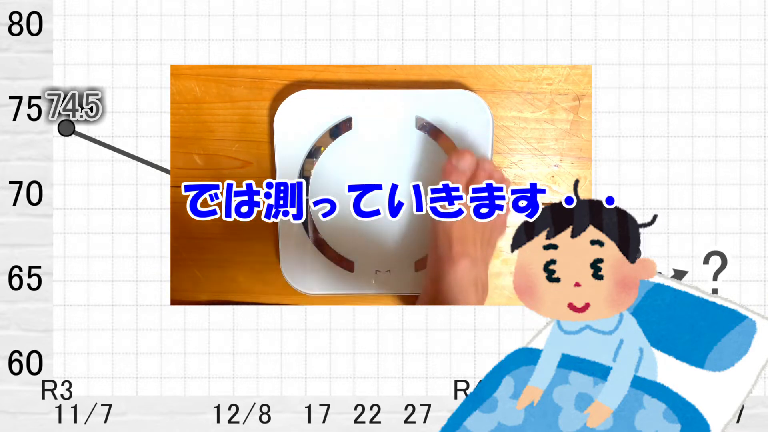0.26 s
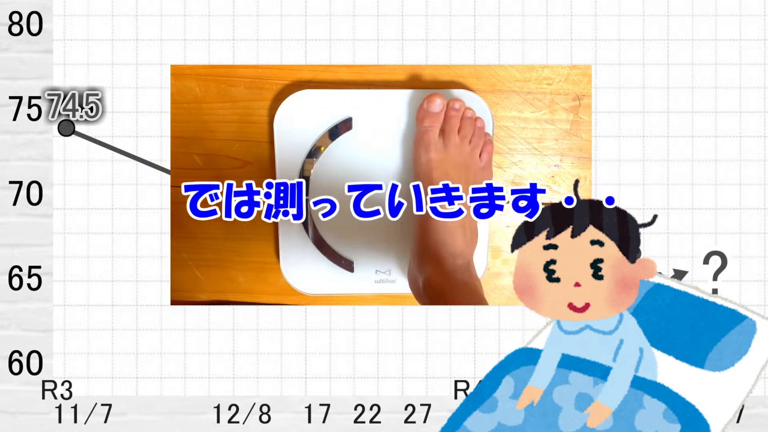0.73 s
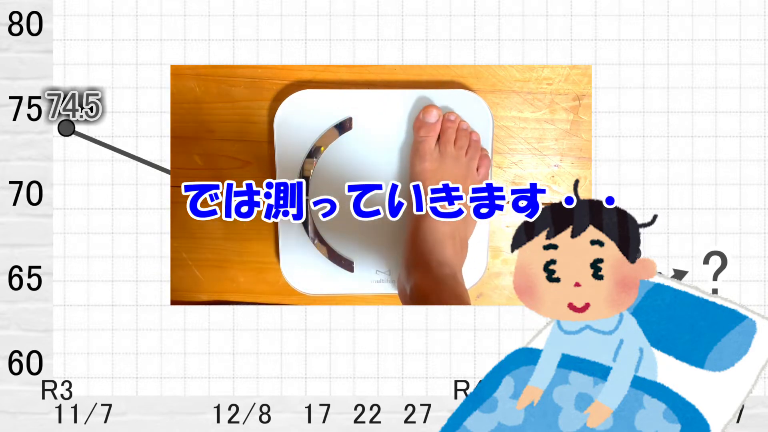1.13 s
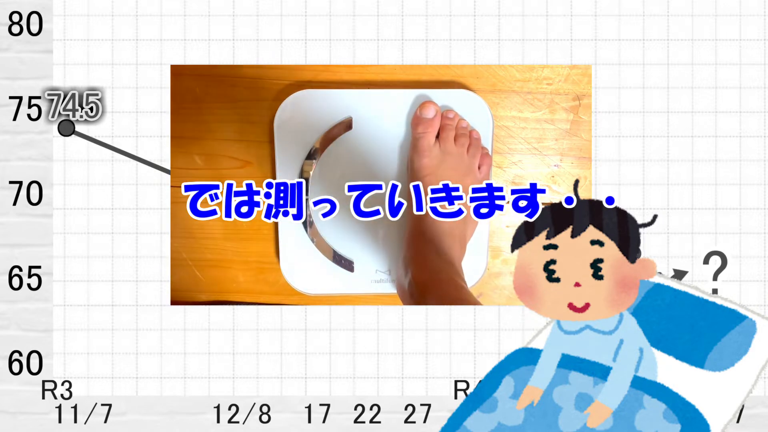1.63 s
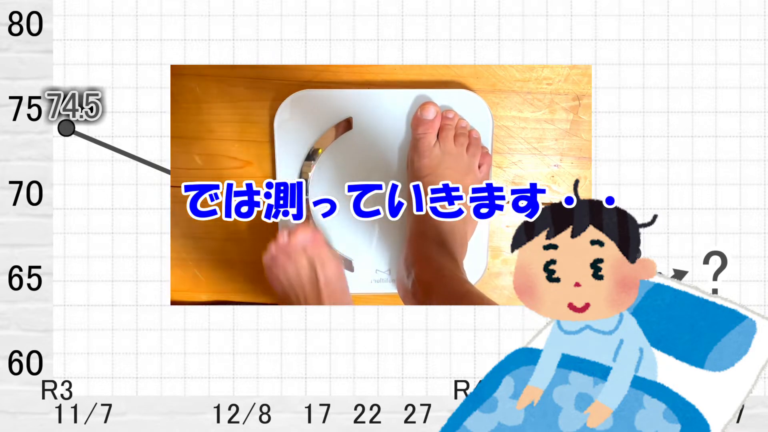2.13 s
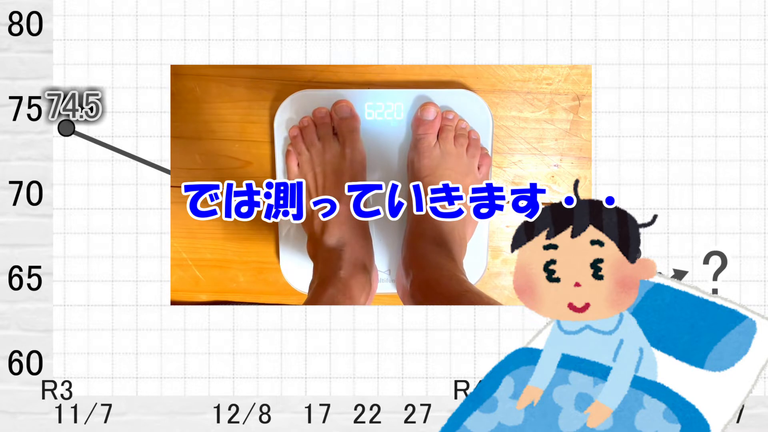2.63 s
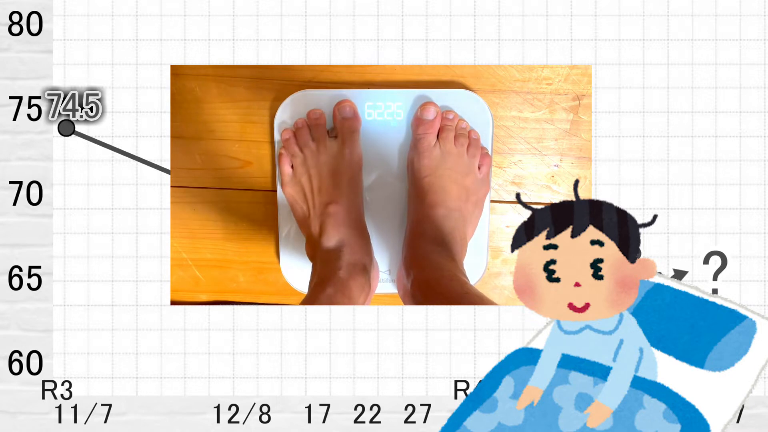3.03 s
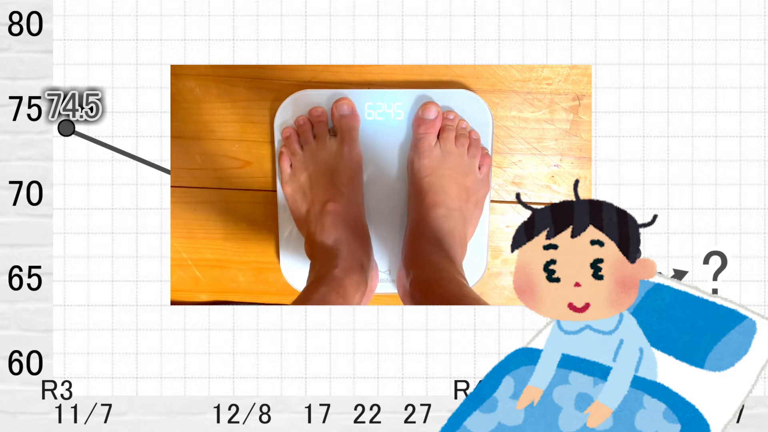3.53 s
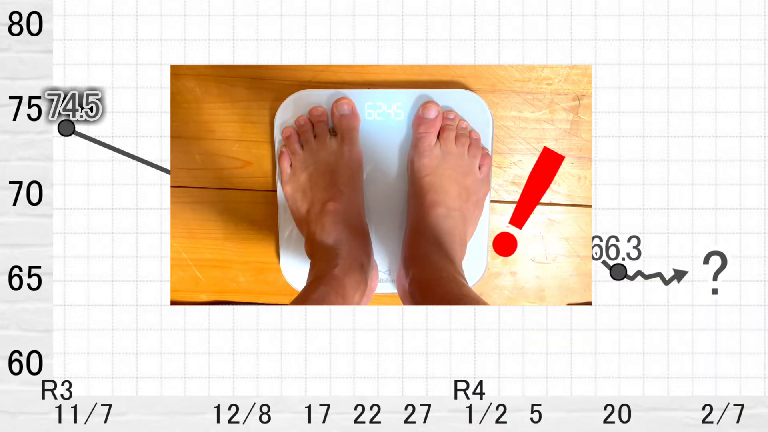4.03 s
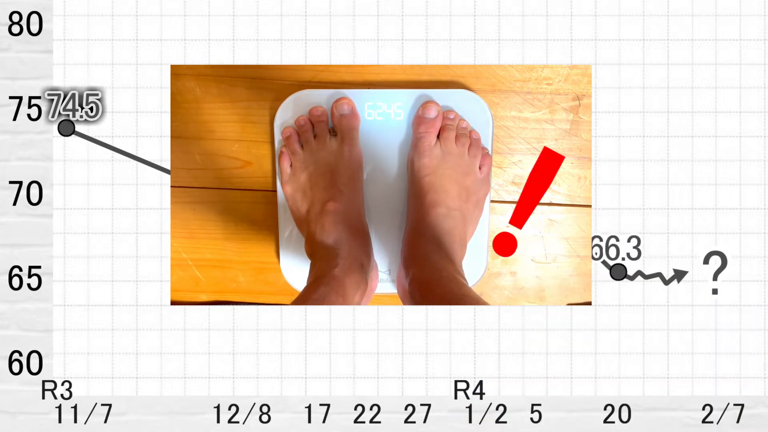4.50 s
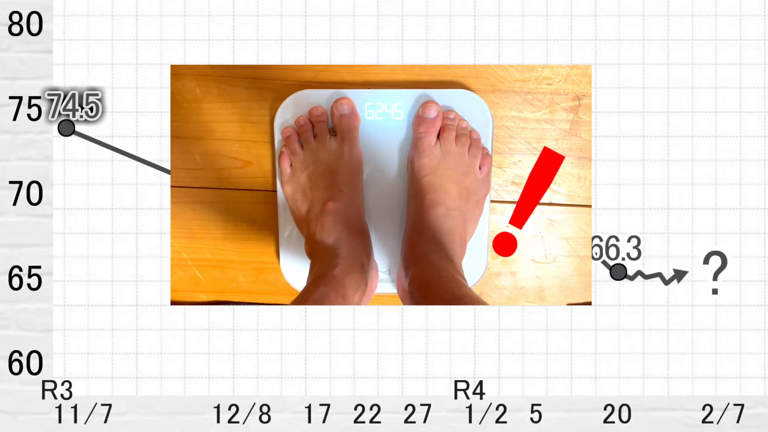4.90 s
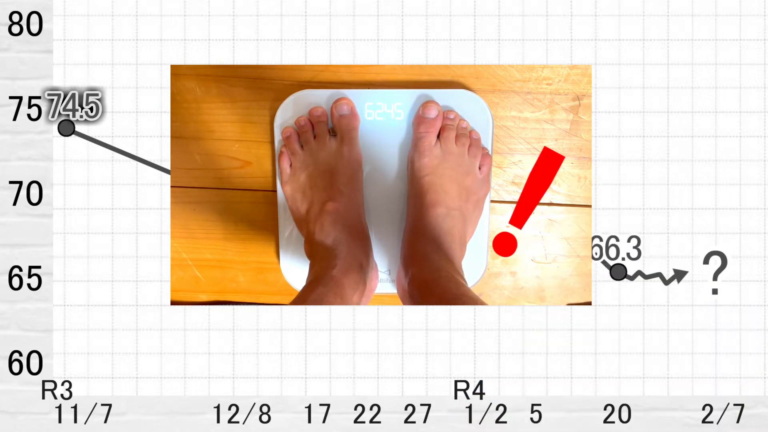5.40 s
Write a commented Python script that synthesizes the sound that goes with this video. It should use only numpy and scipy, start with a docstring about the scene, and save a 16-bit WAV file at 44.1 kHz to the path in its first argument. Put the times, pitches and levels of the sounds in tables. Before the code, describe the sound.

A phone held above a scale picks up deep wavering hum and soft room hiss. A foot slides on quietly, one crisp click stands out, and lighter clicks trail after it. The other foot lands with muffled thuds into the boards, followed by a short skin rub and a last few ticks. The hum continues alone, skipping slightly with a dry tick. Short, close indoor echoes.

```python
"""Small bathroom with a wooden floor: bare feet step onto a glass scale, heard from above by a phone.
Clicks are noise bursts ringing the scale's modes; sliding skin is grainy hiss with a resonant squeak.
Thuds into the boards are decaying resonant noise. A machine hums in wavering sines over steady
noise-driven resonances, with broad noise and hiss behind. Near the end the hum jumps in phase, with a tick."""
import sys
import numpy as np
from scipy import signal
from scipy.fft import rfft, irfft, next_fast_len
from scipy.io import wavfile
from scipy.ndimage import uniform_filter1d

SR = 44100
rng = np.random.default_rng(int(sys.argv[2]) if len(sys.argv) > 2 else 0)


def pcm_store(signal):
    """Save signal as 16-bit PCM."""
    levels = np.round(np.clip(np.atleast_2d(signal), -1, 1) * 32767)
    wavfile.write(sys.argv[1], SR, levels.astype(np.int16).T)


N = 249253

JUMP_S = 4.5018  # phase jump of the hum, and its tick


def amp(db):
    """Decibels to gain."""
    return 10 ** (np.asarray(db) / 20)


def evened(x):
    """Scales to rms 1."""
    return x / np.sqrt(np.mean(x ** 2) + 1e-20)


def read(points, hz):
    """Interpolates (hz, value) points on a log-frequency axis."""
    point_hz, value = np.transpose(points)
    return np.interp(np.log(hz + 1), np.log(point_hz + 1), value)


def add(mix, start_s, sound):
    """Mixes a sound in at a time, cut at the end of the mix."""
    part = mix[round(start_s * SR):][:len(sound)]
    part += sound[:len(part)]


def resonate(x, hz, width_hz):
    """Steep resonance: shifts hz down to zero, applies a double pole, shifts back."""
    turn = np.exp(2j * np.pi * np.cumsum(hz * np.ones(len(x))) / SR)
    r = np.exp(-np.pi * abs(width_hz) / SR)
    smooth = signal.lfilter([(1 - r) ** 2], [1, -2 * r, r * r], x / turn)
    return 2 * (turn * smooth).real


def shape(x, gain_db):
    """Filters by a gain that is a function of frequency."""
    hz = np.fft.rfftfreq(len(x), 1 / SR)
    return irfft(rfft(x) * amp(gain_db(hz)), len(x))


def drift(t, top_hz):
    """Slow random waver of rms 1: sines from 0.2 Hz to top_hz, weaker as they get faster."""
    rates_hz = np.geomspace(.2, top_hz, num=20)
    return evened(sum(np.sin(2 * np.pi * (f * t + rng.random())) / np.sqrt(f) for f in rates_hz))


def click(level_db, hz, narrow_db, low_db, high_db, treble_db):
    """A short rattle drives the scale's modes; where it lands decides which ones answer."""
    # modes of the scale: mode_hz, least width_hz, level_db
    plate = [(464, 130, -4.5), (617, 124, 4.5), (858, 130, -2.5), (1012, 67, 7), (1600, 790, 0.5),
             (2390, 1260, 6.5), (2540, 650, 6), (3180, 1250, 0.5), (4000, 1060, 4), (4030, 1400, 5.5),
             (5530, 630, 1.5), (6200, 580, 0), (7600, 2200, 3), (8040, 770, 0), (9500, 3100, 5),
             (13200, 2400, -7.5), (14800, 2500, -7)]
    rattle_t60_s, rise_s = 0.02, .0007
    max_sharpness = 7  # pitch over width, damped by the foot
    t = np.arange(2500) / SR
    rise = 1 - np.exp(-t / rise_s)
    rattle = rng.standard_normal(len(t)) * rise * amp(-60 * t / rattle_t60_s)
    loose_part = (hz, hz * 0.26, 1.5)
    out = 0
    for k, (mode_hz, width_hz, mode_db) in enumerate([*plate, loose_part]):
        if mode_hz < 740:
            share_db = low_db
        elif mode_hz < 1200:
            share_db = high_db
        elif mode_hz > 8000:
            share_db = treble_db
        else:
            share_db = -abs(narrow_db) * min(np.log2(mode_hz / hz) ** 2, 3)
        ring = resonate(rattle, mode_hz, max(width_hz, mode_hz / max_sharpness))
        sign = (-1) ** k
        out = out + sign * amp(mode_db + share_db) * ring / abs(ring).max()
    return amp(level_db) * out


def slide(rise_s, hold_s, fall_s, level_db, treble_db, squeak_hz, squeak_db):
    """Skin catching on glass: hiss broken into small grains, with a squeak; both follow the speed."""
    # colour of the hiss: hz, relative level_db_per_hz
    skin = [(600, -28), (1100, -5.5), (1600, -5.5), (2400, -1.5), (4000, -7), (6000, -10), (7800, -16.5),
            (10000, -13), (13000, -17.5), (15500, -14)]
    quiet_db = -20  # at start and end, relative to full speed
    squeak_sag = .05  # share by which the squeak sits lower at no speed
    split_hz = 8300
    t = np.arange(0, rise_s + hold_s + fall_s, 1 / SR)
    speed = np.clip(np.minimum(t / rise_s, (t[-1] - t) / fall_s), 0, 1)
    slow = 1 - speed
    grain_noise = uniform_filter1d(rng.standard_normal(len(t)), size=160)
    grains = amp(2.4 * evened(grain_noise))
    hiss = shape(grains * rng.standard_normal(len(t)), lambda f: read(skin, f))
    low = evened(shape(hiss, lambda f: -80 * (f > split_hz)))
    high = evened(shape(hiss, lambda f: -80 * (f < split_hz)))
    squeak = evened(resonate(hiss, squeak_hz * (1 - squeak_sag * slow), 348.4))
    sound = low + amp(treble_db) * high + amp(squeak_db) * squeak
    return amp(level_db + quiet_db * slow) * sound


def thud(level_db, hz):
    """Weight sinking into the boards: a soft push, dull and slow to rise."""
    t60_s, rise_s = 0.13, 0.0021
    t = np.arange(9000) / SR
    push = evened(resonate(rng.standard_normal(len(t)), hz, 240))
    return amp(level_db - 60 * t / t60_s) * (1 - np.exp(-t / rise_s)) * push


def hum():
    """Machine: sines wavering in level and phase, over steady noise-driven resonances up to about 1 kHz."""
    # mean pitches of the steady tones: hz
    tone_hz = [58.3, 65.33, 202.62, 415.3]
    # phase each tone skips at the jump: turns
    skip_turns = [0, -.47, .4, 0]
    # steady tones: level_db (main tone: offset from main_level), waver_db
    tone_levels = [(-53.5, 4.3), (0, -0.23), (-59.5, 2.1), (-70.5, 3.5)]
    # slow level of the main tone: time_s, level_db
    main_level = [(0.0, -37), (0.22, -42.5), (0.6, -44), (1.15, -40), (1.35, -45.5), (1.92, -41),
                  (2.44, -43.5), (2.6, -41), (3.07, -43.5), (3.43, -40), (4.09, -42.5), (4.88, -43.5),
                  (5.3, -39.5), (5.48, -40), (5.65, -42.5)]
    # swells of the main tone's octave: time_s, level_db
    octave_level = [(0.0, -59.5), (0.38, -57), (0.42, -68), (1.64, -60.5), (1.78, -56), (2.0, -65.5),
                    (2.36, -57), (2.69, -56), (3.02, -64.5), (3.59, -62.5), (3.7, -74), (4.06, -58.5),
                    (4.48, -53), (5.22, -64), (5.65, -60.5)]
    # steady noise-driven resonances: hz, width_hz, level_db (before the bass cut)
    boom = [(44.2, 12, -69), (63, 12, -52), (91, 10, -55.5), (584, 90, -85.5), (972, 100, -89)]
    main_hz = tone_hz[1]
    t = np.arange(N) / SR
    after_jump = np.clip((t - JUMP_S) / .003 + .5, 0, 1)  # 3 ms ramp

    octave_db = np.interp(t, *np.transpose(octave_level))
    octave_phase = 2 * np.pi * (2 * main_hz * t + rng.random()) + 0.41 * drift(t, 3.2)
    out = np.sqrt(2) * amp(octave_db) * np.sin(octave_phase)
    for hz, turns, (level_db, waver_db) in zip(tone_hz, skip_turns, tone_levels):
        if hz == main_hz:
            level_db = level_db + np.interp(t, *np.transpose(main_level))
        phase = 2 * np.pi * (hz * t + rng.random() + turns * after_jump) + 0.13 * drift(t, 1.5)
        out += np.sqrt(2) * amp(level_db + waver_db * drift(t, 3)) * np.sin(phase)
    for hz, width_hz, level_db in boom:
        out += amp(level_db) * evened(resonate(rng.standard_normal(N), hz, width_hz))
    return out


def tick():
    """The wave steps down at the hum's jump and settles exponentially: a dry tick."""
    step_db, settle_s = -43, 0.0054
    out = np.zeros(N)
    add(out, JUMP_S, -amp(step_db) * np.exp(-np.arange(800) / SR / settle_s))
    return out


def air():
    """Broad room noise and microphone hiss: shaped spectral noise, faintly patchy in time and pitch."""
    # colour: hz, relative level_db_per_hz
    colour = [(30, -11.5), (50, -5.5), (100, -6.5), (170, -16.5), (300, -19), (450, -16), (510, -30.5),
              (750, -32), (1150, -40), (2000, -45), (4500, -51.5), (8000, -56.5), (11000, -60.5),
              (13000, -65.5)]
    # left-right correlation of the noise: hz, correlation
    correlation = [(120, 1), (290, 0.66), (640, -0.33), (1400, -0.13), (3000, 0.1), (4600, .25), (5500, 1),
                   (7500, .75), (9500, 0.81), (11000, 1), (13000, 0.52), (15500, 0.78)]
    # channel balance: hz, left_minus_right_db
    tilt = [(60, 1), (240, 1.5), (950, 0), (3770, 0.5), (15000, -0.5)]
    level_db, patch_db = -51.5, 1.64
    frames, hz = N // 512 + 5, np.fft.rfftfreq(2048, 1 / SR)
    a, b, c, d, patches = rng.standard_normal((frames, 1025, 5)).T
    patches = uniform_filter1d(patches, size=6, axis=1)
    patches = evened(uniform_filter1d(patches, size=20, axis=0))
    same = np.clip(read(correlation, hz), -1, 1)[:, None]
    left = a + 1j * b
    right = same * left + np.sqrt(1 - same ** 2) * (c + 1j * d)
    balance_db = np.multiply.outer([.5, -.5], read(tilt, hz))[..., None]
    z = np.array([left, right])
    z *= amp(read(colour, hz)[:, None] + patch_db * patches + balance_db)
    noise = signal.istft(z, nperseg=2048, noverlap=1536)[1][:, :N]
    return amp(level_db) * evened(noise)


def room(x):
    """Echoes: sparse taps of random sign, each band dying at its own speed, largely shared left and right."""
    # decay: hz, t60_s
    decay = [(300, 0.085), (1500, 0.13), (5000, 0.1), (10000, 0.11), (15000, 0.077)]
    taps = np.zeros((3, SR // 2))
    at = np.arange(200, SR // 2 - 8, 8) + rng.integers(0, 8, (3, (SR // 2 - 201) // 8))
    np.put_along_axis(taps, at, rng.choice([-1., 1.], at.shape), 1)
    shared, own = taps[0], taps[1:]
    hz, t, z = signal.stft(shared + 0.43 * own, SR, nperseg=128)
    fade = amp(-60 * t / read(decay, hz)[:, None])
    tail = signal.istft(z * fade, SR, nperseg=128)[1]
    return signal.fftconvolve(x[None], tail / np.linalg.norm(tail[0]), axes=1)[:, :N]


def scene():
    """Feet and scale, direct and echoed by the room, over hum and air."""
    # clicks: start_s, level_db, stressed pitch_hz, narrowing_db_per_octave_squared (sign ignored),
    # low_knock_db, high_knock_db, treble_db
    clicks = [(0.2225, -76, 1400, 6, 10, -4, -25), (0.9038, -57, 1600, 9.5, -12, -14, -27),
              (0.9414, -73, 2670, 11, -6, -12, 0), (1.2346, -66.5, 3200, -2, -5, -9, -4),
              (1.2585, -39, 5210, 3.5, -2, -13.5, -2.5), (1.2698, -58.5, 3750, 3, 1, -4, 2),
              (1.3244, -68.5, 1900, 0.5, -9, -9, -6), (1.3808, -59.5, 3100, 10.5, 5.5, -12, -30),
              (1.4521, -65, 1850, 9, -14, -12, -30), (1.509, -51, 3480, 7, -19, -28, 0.5),
              (1.5214, -53.5, 3000, 5.5, -10, -20, -25), (1.5304, -62, 5100, -2, -10, -9, -3),
              (1.6556, -62, 2260, 5, -29, -9, -30), (1.8332, -58.5, 2120, 2.5, -8, -12, -3),
              (1.8554, -74, 2000, 6, -20, -14, -25), (1.8726, -68, 1990, 6, -14, -12, -21),
              (1.935, -65.5, 1920, 4, -25, -21, -10), (2.4633, -71, 3340, 7, -16, -18, -17),
              (2.4962, -54, 3000, 4, -34, -21, -1), (2.5044, -69, 2250, 10, -20, 1.5, -22),
              (2.5214, -67, 3750, 7, -17, -14, -12), (2.539, -77, 4500, 4, -20, -15, -8),
              (2.5965, -69, 3300, 10, -2, -4.5, -30), (2.6074, -75, 4000, 8, 0, -6, -21),
              (2.6224, -74, 2980, 6, -5, -16, -24), (2.9377, -68, 2500, -2, -12, -15, -14),
              (3.1425, -71, 1300, 5, 1, 5, -25), (3.1577, -65.5, 2600, 6, -16, -8, -16),
              (3.2515, -69.5, 2600, 4.5, -14, -8, -20)]
    # skin slides: start_s, rise_s, hold_s, fall_s, level_db, treble_db, squeak_hz, squeak_db
    slides = [(0.19, 0.033, 0.16, 0.057, -82.5, -16, 1360, 1),
              (0.86, 0.024, 0.076, 0.08, -75.5, -14, 1900, -13),
              (1.085, 0.048, 0.052, .035, -65.5, -13, 2350, -21),
              (1.834, 0.012, 0.098, 0.041, -73.5, -4, 2620, -11),
              (2.92, 0.027, 0.027, 0.028, -67, -3, 2420, -8.5)]
    # thuds: start_s, level_db (before rise and decay), pitch_hz
    thuds = [(2.44, -57, 360), (2.511, -50.5, 231), (2.568, -47.5, 254), (2.605, -50.5, 420),
             (3.139, -50, 433)]
    spots, boards = np.zeros((4, N)), np.zeros(N)
    for k, (start_s, *row) in enumerate(clicks):  # spots taken in turn, each with its own echoes
        add(spots[k % len(spots)], start_s, click(*row))
    for k, (start_s, *row) in enumerate(slides):
        add(spots[k % len(spots)], start_s, slide(*row))
    for start_s, *row in thuds:
        add(boards, start_s, thud(*row))
    direct = spots.sum(axis=0) * amp([[-.3], [.3]])  # left, right
    echoes = sum(room(spot) for spot in spots)
    floor = boards + amp(-5.0) * room(boards)
    return direct + amp(-8.0) * echoes + floor + hum() + air()


def record(dry):
    """Left and right channels with treble out of phase, a bass cut, the tick and a band limit."""
    # left-right phase difference: hz, left_minus_right_rad
    phase_difference = [(1200, 0), (2500, .9), (4300, .9), (4900, .3), (6200, 1.7), (7650, 3.14),
                        (9200, 4.6), (10700, 6.28), (12800, 7.7), (13700, 9.4), (14800, 11.8),
                        (16000, 12.2)]
    bass_cut_hz, band_limit_hz = 40, 15950
    size = next_fast_len(N)
    hz = np.fft.rfftfreq(size, 1 / SR)
    phase_turn = np.exp(.5j * np.multiply.outer([1, -1], read(phase_difference, hz)))
    bass_cut = 1 / np.sqrt(1 + (bass_cut_hz / (hz + 1)) ** 8)
    heard = irfft(rfft(dry, size) * phase_turn * bass_cut, size)[:, :N] + tick()
    lowpass = signal.firwin(511, band_limit_hz, window=("kaiser", 9), fs=SR)
    return signal.oaconvolve(heard, lowpass[None], "same")


dry = scene()
out = record(dry)
pcm_store(out)
```